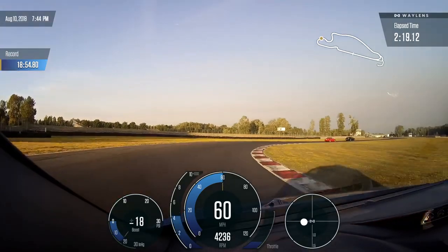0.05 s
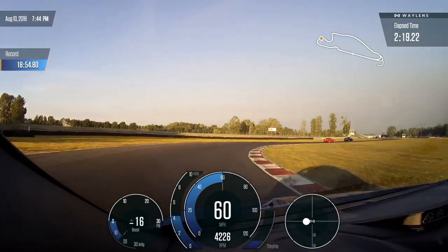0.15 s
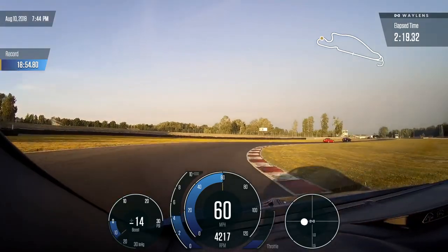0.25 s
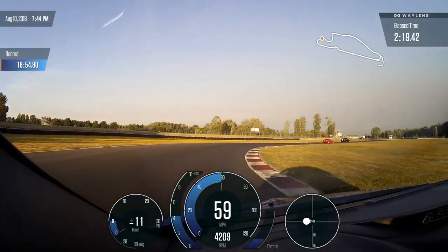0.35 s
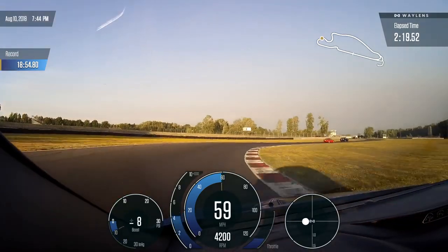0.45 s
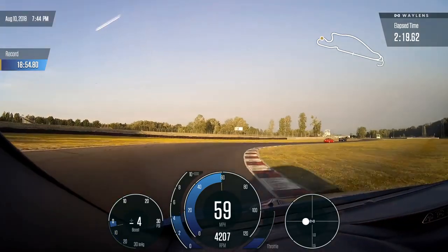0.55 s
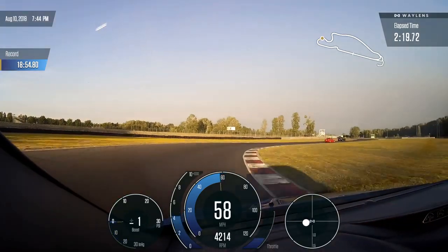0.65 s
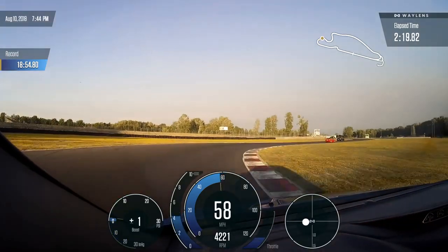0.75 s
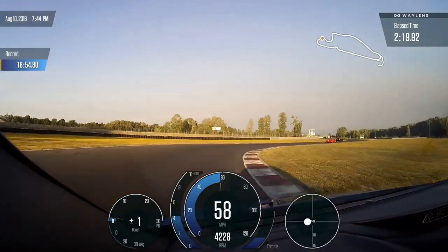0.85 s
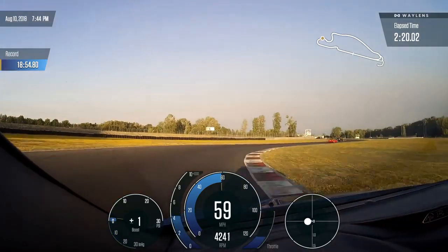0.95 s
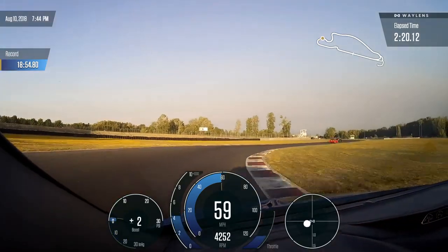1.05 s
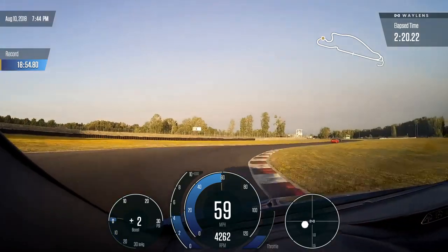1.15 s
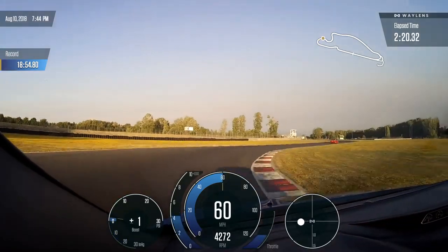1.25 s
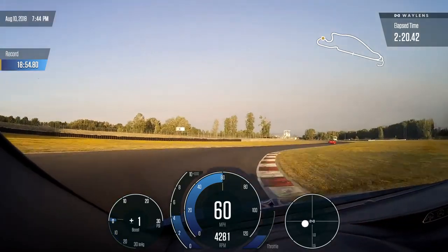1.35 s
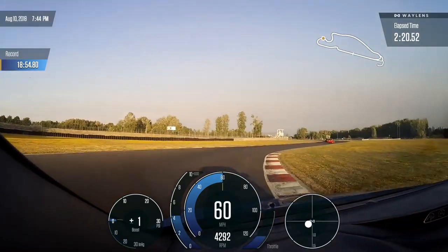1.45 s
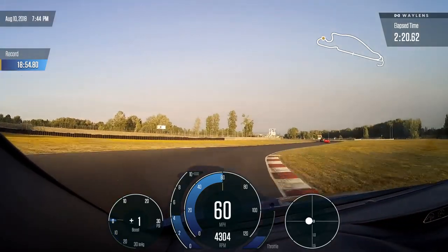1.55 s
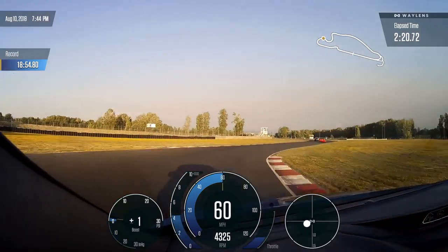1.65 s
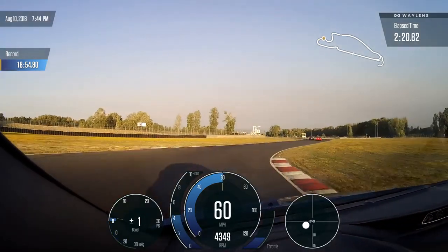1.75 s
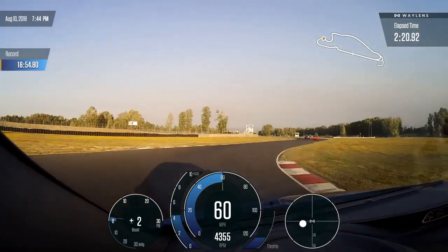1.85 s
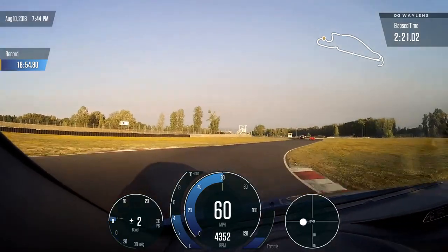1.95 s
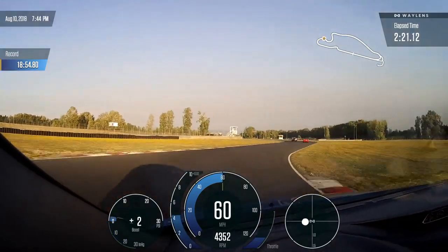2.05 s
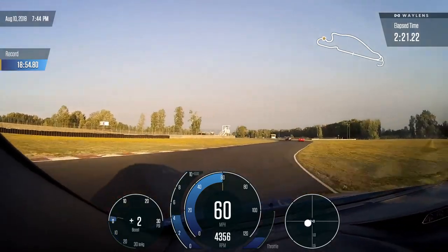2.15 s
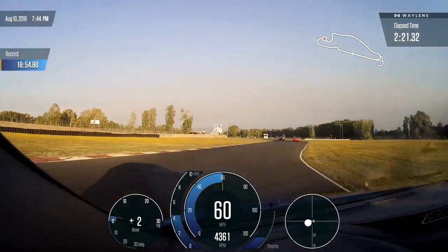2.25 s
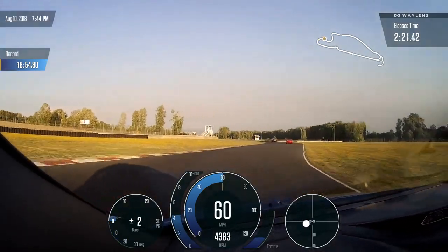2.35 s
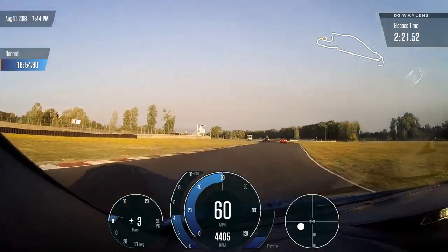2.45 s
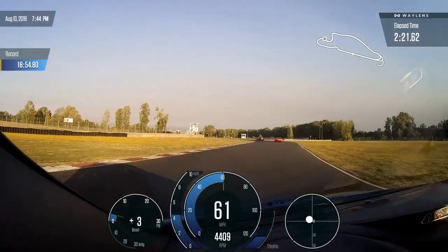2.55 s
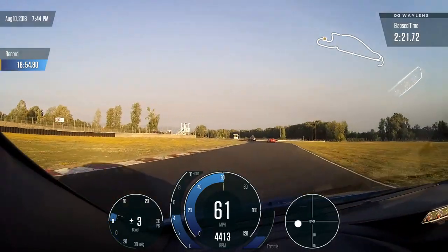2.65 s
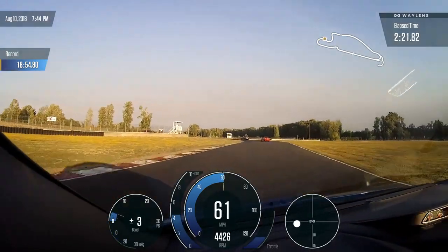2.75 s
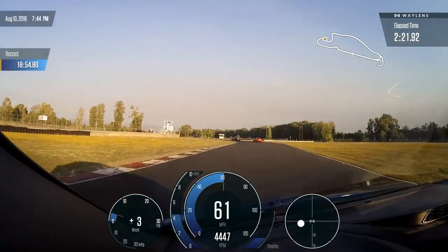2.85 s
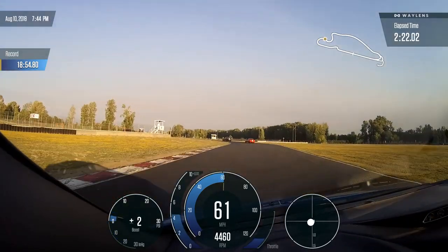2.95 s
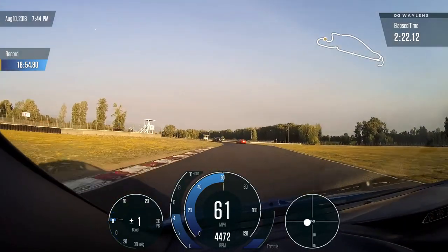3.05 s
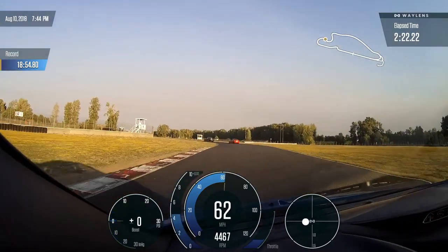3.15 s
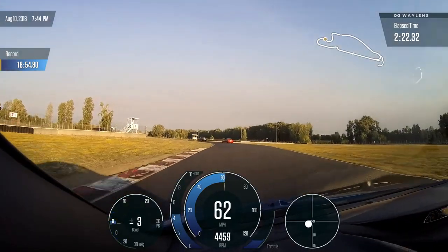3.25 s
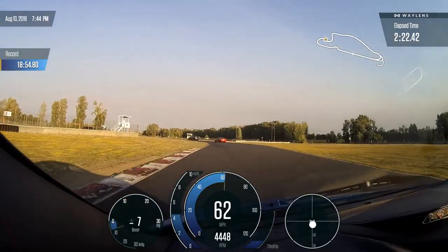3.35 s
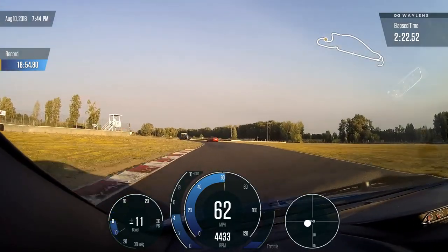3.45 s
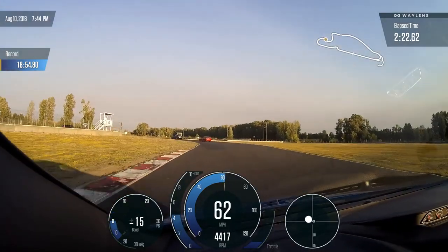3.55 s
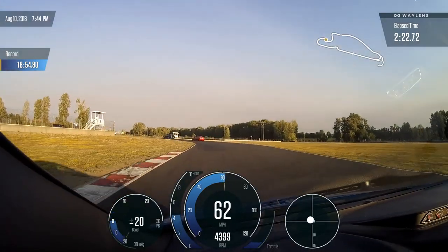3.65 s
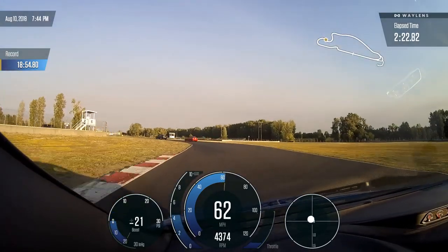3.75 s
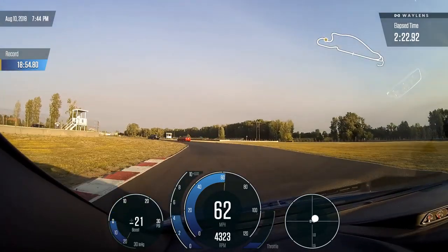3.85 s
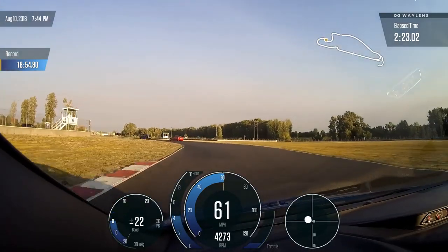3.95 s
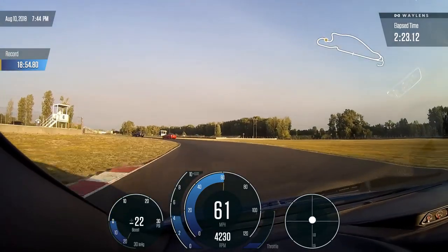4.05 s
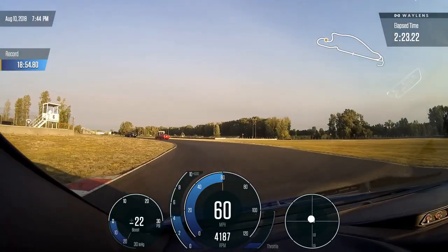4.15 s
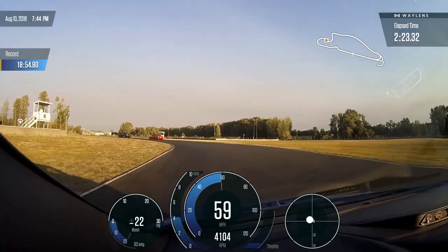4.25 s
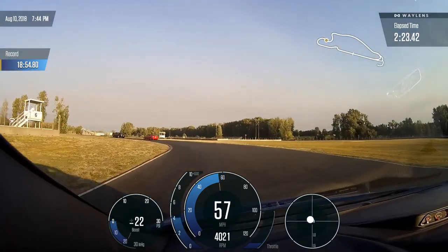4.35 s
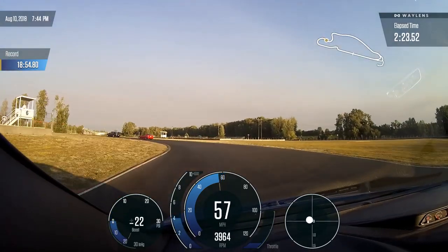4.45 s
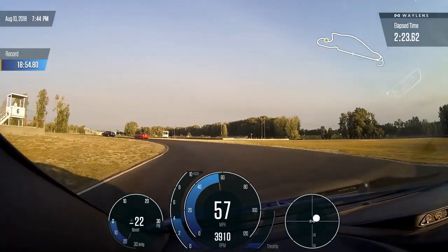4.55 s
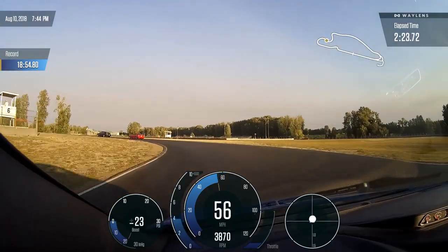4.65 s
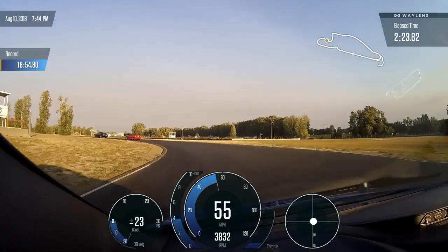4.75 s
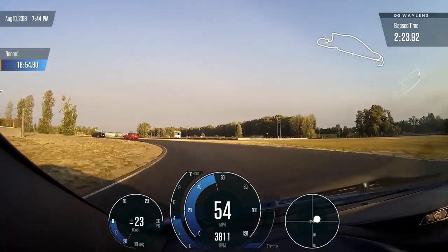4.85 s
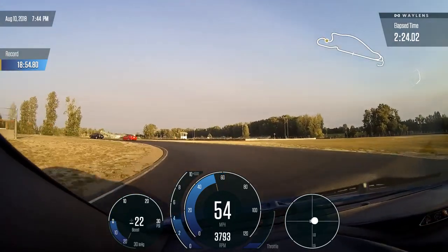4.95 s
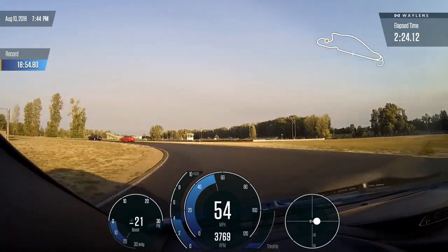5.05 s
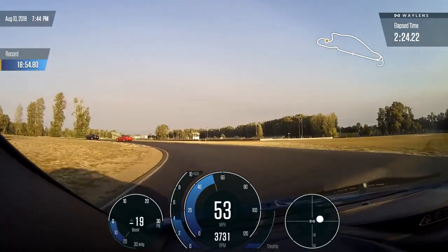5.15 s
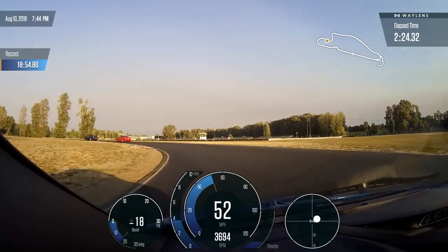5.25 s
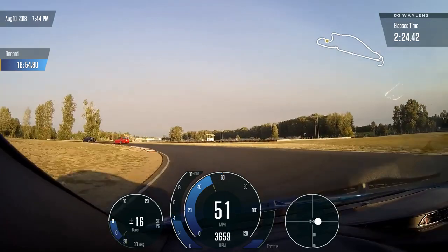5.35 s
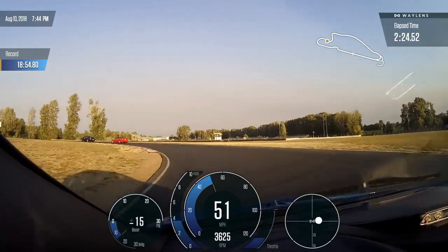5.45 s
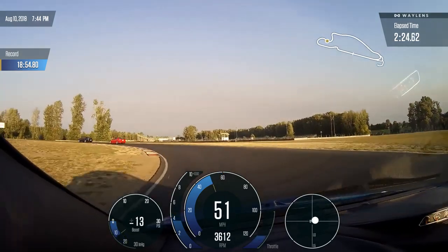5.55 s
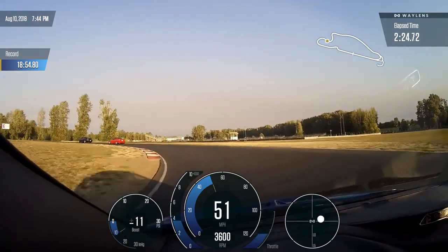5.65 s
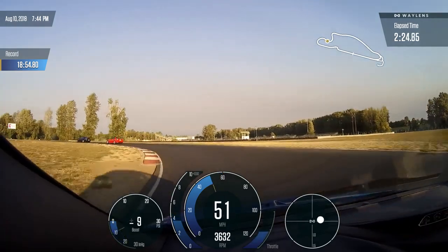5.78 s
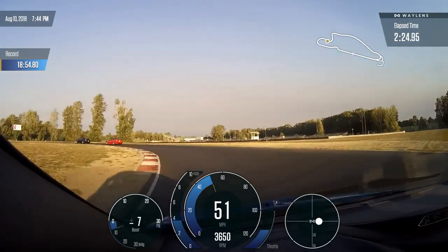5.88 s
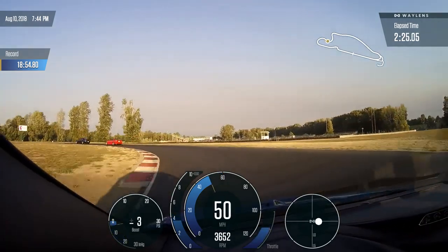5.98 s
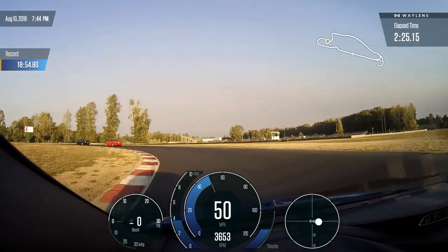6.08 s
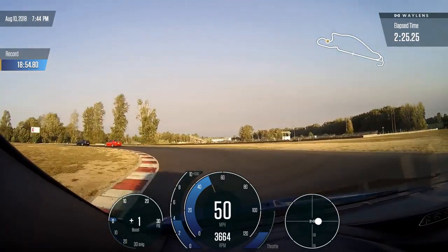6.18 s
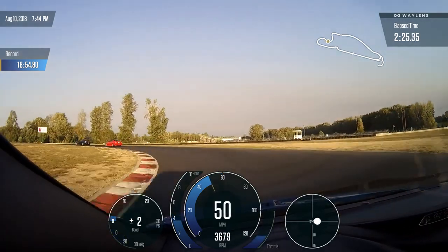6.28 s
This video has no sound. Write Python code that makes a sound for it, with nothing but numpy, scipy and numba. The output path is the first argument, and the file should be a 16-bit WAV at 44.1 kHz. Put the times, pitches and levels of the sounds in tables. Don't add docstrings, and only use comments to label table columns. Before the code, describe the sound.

A booming four-cylinder engine pulls through a bend amid tyre and wind roar, drums over a kerb, then slows with a short turbo whistle.

```python
import sys
import numpy as np
from scipy import signal
from scipy.fft import rfft, irfft, next_fast_len
from scipy.io import wavfile
from scipy.ndimage import uniform_filter1d
from numba import njit

SR = 44100
rng = np.random.default_rng(int(sys.argv[2]) if len(sys.argv) > 2 else 0)


def waveform_to_disk(signal):
    frames = np.transpose(np.atleast_2d(signal))
    scaled = np.clip(frames, -1, 1) * 32767
    samples = np.round(scaled).astype(np.int16)
    wavfile.write(sys.argv[1], SR, samples)


def linear_from_db(decibels):
    return 10 ** (np.asarray(decibels, float) / 20)


N = 278712
TIME = np.arange(N) / SR

# time in seconds, throttle from 0 to 1, pressure of the engine's air from 0 to 1.
PEDAL = [(0, .3, 0.35), (.5, 0.48, 0.5), (.62, 0.95, 0.6),
                                               (.92, 0.9, 0.7), (1.05, 1, 0.94), (3.33, 0.92, 1),
                                               (3.41, 0.42, 0.4), (3.62, .3, .45), (3.75, 0.1, 0.4),
                                               (4.05, 0.34, 0.14), (5.78, 0, 0), (5.85, 0.91, 0.7),
                                               (6.32, 0.75, 0.9)]
# time in seconds, sideways tyre slip in dB, air flow through intake and round the screen in dB.
CORNER = [(0, 5, 1), (.5, 3.5, -.5), (.8, 3, -2), (.97, 0.5, -0.5), (1.42, 2.5, 3), (1.75, 6, 1.5),
          (2.2, 4, 5), (2.37, 1, 8.5), (2.6, 2, 7), (3.0, 0.5, 6.5), (3.48, -0.5, 7.5), (3.75, -2.5, 4.5),
          (4.27, -5, -1.5), (4.5, -3.5, -5), (4.7, -6, -5), (5.5, -2, -3), (6.0, -2.5, -4.5),
          (6.32, 0.5, -3)]


def curves(table):
    s, *columns = np.transpose(table)
    return [np.interp(TIME, s, c) for c in columns]


def walk(rate):
    k = int(SR / rate)
    levels = np.repeat(rng.standard_normal(N // k + 1), k)
    return 1.1 * uniform_filter1d(uniform_filter1d(levels, k), k)[:N]


def bell(at, half):
    return np.exp(-.5 * ((TIME - at) / half) ** 2)


def between(span_db, control):
    return span_db[0] + (span_db[1] - span_db[0]) * control


@njit
def svf(x, hz, width):
    y, b, l = np.empty(len(x)), 0., 0.
    for i in range(len(x)):
        g, k = np.tan(np.pi * hz[i] / SR), width[i] / hz[i]
        v = (b + g * (x[i] - l)) / (1 + g * (g + k))
        b, l, y[i] = 2 * v - b, l + 2 * g * v, k * v
    return y


def ring_twice(x, hz, width, second_width):
    centre = np.full(N, 1. * hz)
    return svf(svf(x, centre, np.full(N, 1. * width)), centre, np.full(N, 1. * second_width))


def hiss(hz, width):
    hz, width = hz * np.ones(N), width * np.ones(N)
    band = svf(svf(rng.standard_normal(N), hz, width), hz, width)
    return band * np.sqrt(SR / (np.pi / 2 * width))


def slice_of_noise(lo_hz, hi_hz):
    spectrum, hz = rfft(rng.standard_normal(N)), np.arange(N // 2 + 1) * SR / N
    return irfft(spectrum * (hz > lo_hz) * (hz < hi_hz), N)


def air():
    # time in seconds, extra rumble in dB, half length in seconds.
    bumps = [(.05, 5, 0.17), (.5, 5.5, .1), (1.45, 10, .14), (2.1, 6.5, .1), (2.4, 6, .12), (2.84, 3, .05),
             (3.7, 4, .13), (4.15, 4, .1), (5.2, 1, .25), (5.6, -4.5, 0.045), (6.05, -6.5, 0.13),
             (.3, 4.5, .07), (1.2, 4, 0.066), (1.75, 5.5, .06)]
    slip_db, flow_db = curves(CORNER)
    bump_db = sum(db * bell(s, half) for s, db, half in bumps)
    pull = uniform_filter1d(curves(PEDAL)[0], int(.3 * SR)) - .5
    gust_db = 3 * bell(2.39, 0.11)
    rumble_db = -41 + bump_db
    drone_db = -35 + .35 * flow_db + 0.17 * slip_db + 4.5 * pull + 0.14 * bump_db
    tyre_db = -38.5 + slip_db
    wind_db = -53.5 + 0.59 * flow_db + 0.13 * slip_db + gust_db
    intake_db = -61 + flow_db
    return np.array([rumble_db, drone_db, tyre_db, wind_db, intake_db])


def patchy(x, hiss_db=1.5, notch_db=2.2):
    # frequency in Hz, share of the time from 0 to 1.
    gap_share = [(3000, 0), (3400, .03), (4700, .03), (5000, .3), (5300, .3), (6200, .45), (6500, .35),
                 (6900, .02), (8300, .02), (9000, .1), (14000, .1)]
    hz, s, cells = signal.stft(x, SR, nperseg=1024)
    shape = (2, len(hz) // 4 + 1, len(s) // 5 + 1)

    def spread(v):
        return v.repeat(4, axis=1).repeat(5, axis=2)[:, :len(hz), :len(s)]

    depth = hiss_db * (hz > 3300) + notch_db * np.exp(-.5 * ((hz - 5800) / 700) ** 2)
    gaps = spread(rng.random(shape)) < np.interp(hz, *np.transpose(gap_share))[:, None]
    change_db = depth[:, None] * spread(rng.standard_normal(shape)) - 18 * gaps
    return signal.istft(cells * linear_from_db(change_db), SR, nperseg=1024)[1][:, :N]


def roar(phase):
    air_hz = [50, 300, 900, 2800, 8000]
    # frequency in Hz, level in dB.
    bass, treble, ports = [(14, -21.5), (30, -6), (48, -3.5), (68, -10.5), (95, -7), (130, -3), (160, -9),
                           (205, -7.5), (250, -14), (290, -17.5), (370, -13), (500, -13), (620, -14.5)], [(726, -15.5), (969, -11), (1240, -25.5), (1340, -30), (1680, -39),
                                         (2800, -34), (3370, -49.5), (4050, -43), (5410, -62.5),
                                         (6100, -60.5), (7510, -49), (8790, -56), (11100, -54),
                                         (14300, -59)], [(20, -92.5), (1000, -90.5), (1090, -42.5),
                                                         (1440, -36), (2330, -45.5), (3070, -44.5),
                                                         (3510, -53), (4100, -45), (4680, -56.5),
                                                         (5930, -46), (7220, -57), (12400, -55.5),
                                                         (14300, -58)]
    # frequency in Hz, width in Hz, strength in dB.
    panels = [(145, 53, -4.5), (423, 29, -2.5), (590, 50, -1.5), (191, 33, 3), (353, 37, 2), (510, 33, 2.5),
              (670, 20, 1), (880, 41, -4.5), (1240, 17, 4), (2967, 290, 5), (3920, 230, 3),
              (10160, 380, -4.5)]
    size = next_fast_len(N)
    octave = np.log2(np.maximum(np.arange(size // 2 + 1) * SR / size, 1))
    colours = []
    for table in ([*bass, *treble], ports):
        hz, db = np.transpose(table)
        colours.append(linear_from_db(np.interp(octave, np.log2(hz), db)))
    rings = linear_from_db(sum(db / (1 + (2 * (2 ** octave - hz) / width) ** 2) for hz, width, db in panels))
    step = int(45 * size / SR)
    spectra = []
    for colour in colours:
        noise = rings * rfft(rng.standard_normal(size)) * colour
        ripple = np.repeat(rng.standard_normal(len(octave) // step + 1), step)
        ripple = uniform_filter1d(ripple, step)[:len(octave)]
        spectra.append(noise * linear_from_db(0.5 * ripple * (octave > 10)))
    levels = air()
    swing = levels - levels.mean(axis=1, keepdims=True)
    out, gust = np.zeros((2, N)), walk(2.6)
    for centre in np.arange(4, 14.1, .5):
        mask = np.cos(np.pi * np.clip(octave - centre, -.5, .5))
        place = np.interp(centre, np.log2(air_hz), np.arange(len(air_hz)))
        k = min(int(place), len(air_hz) - 2)
        db = swing[k] + (place - k) * (swing[k + 1] - swing[k])
        db = db + 0.49 * gust + 0.99 * walk(11) + .5 * (place > 2.8) * walk(5)
        throb = 1 + 0.058 * (place > 1.5) * np.cos(phase)
        out += linear_from_db(db) * throb * np.array([irfft(s * mask, size)[:N] for s in spectra])
    return patchy(out) * linear_from_db(levels.mean() + 35.5)


def side_patches():
    # time in seconds, lowest Hz, highest Hz, half length in seconds.
    bursts = [(.24, 170, 430, .04), (.43, 170, 500, .025), (.47, 20, 130, .02), (.66, 260, 400, .04),
              (1.0, 20, 130, .035), (1.22, 20, 560, .04), (1.31, 260, 560, .02), (1.41, 60, 420, .03),
              (1.61, 390, 520, .02), (1.71, 40, 300, .035), (1.73, 390, 560, .025), (1.84, 20, 260, .03),
              (1.9, 20, 170, .04), (1.98, 130, 390, .025), (2.31, 20, 430, .035), (2.42, 20, 130, .05),
              (2.45, 260, 390, .02), (2.7, 170, 460, .045), (2.77, 20, 130, .025), (3.15, 480, 620, .02),
              (3.18, 20, 260, .04), (3.54, 20, 130, .025), (3.75, 40, 520, .045), (3.86, 220, 390, .04),
              (3.93, 390, 560, .02), (3.98, 220, 390, .03), (4.14, 20, 1000, .025), (4.1, 170, 520, .04),
              (4.26, 20, 600, .08), (4.42, 260, 800, .04), (4.38, 20, 130, .04), (4.51, 20, 130, .045),
              (4.52, 340, 480, .02), (4.63, 340, 480, .02), (5.0, 520, 680, .05), (5.47, 20, 220, .025),
              (5.62, 600, 820, .025), (5.88, 20, 390, .04), (6.02, 20, 110, .015), (6.09, 20, 110, .02)]
    # band centre in Hz, share of the time present from 0 to 1.
    flecks = [(690, .05), (776, .06), (862, .11), (948, .2), (1034, .4)]
    out = np.zeros(N)
    for s, lo, hi, half in bursts:
        swell = np.clip(2.45 * bell(s, half) - 1.5, 0, 1) ** .5
        out += linear_from_db(-38 + 4.5 * (hi < 310)) * swell * slice_of_noise(lo, hi)
    frame, slip_db = 1024, curves(CORNER)[0]
    for hz, share in flecks:
        present = np.repeat(rng.random(N // frame + 1), frame)[:N] < share * linear_from_db(.8 * slip_db)
        fade = uniform_filter1d(1. * present, frame)
        out += linear_from_db(-40.5 + .5 * slip_db) * fade * slice_of_noise(hz - 43, hz + 43)
    return out


def tread(rate=22, width=38, scatter_db=3.0, share_db=-10):
    tread_hz = [640, 700, 810, 860, 900, 950, 1000, 1050]
    out = np.zeros(N)
    for hz in tread_hz:
        chance = rng.random((2, N))
        slips = (chance[0] < rate / SR) * linear_from_db(-scatter_db * np.log(chance[1] + 0.0075))
        out += ring_twice(slips, hz, width, 1.4 * width)
    return out / out.std() * linear_from_db(air()[2] + share_db)


def scrub():
    # time in seconds, centre in Hz, width in Hz, level in dB, half length in seconds.
    rasps = [(.093, 914, 70, -40, 0.059), (.163, 810, 90, -37, 0.018), (.22, 640, 60, -36, 0.042),
             (.44, 962, 90, -41, 0.043), (.495, 688, 60, -40.5, .08), (.65, 950, 100, -43, 0.034),
             (1.033, 750, 400, -31, .004), (1.467, 880, 80, -38, .02), (1.552, 1240, 60, -39, 0.016),
             (1.58, 990, 80, -39, 0.011), (1.663, 870, 140, -36, .018), (1.71, 830, 90, -38, 0.011),
             (1.76, 950, 120, -35, .015), (1.82, 870, 180, -29, .015), (1.91, 830, 100, -31, 0.0083),
             (1.974, 1000, 80, -33, .016), (2.02, 960, 160, -33.5, 0.013), (2.152, 885, 257, -29, 0.019),
             (2.2, 930, 110, -34, .012), (2.284, 840, 120, -37, .012), (2.345, 583, 80, -35, .014),
             (2.478, 860, 90, -33.5, .014), (2.546, 865, 90, -34.5, 0.023), (2.62, 800, 90, -37, .03),
             (2.9, 834, 60, -44, 0.068), (3.75, 990.3, 80, -43, .05), (4.002, 960, 90, -45, .03),
             (4.085, 957, 80, -39, 0.016), (4.21, 987, 100, -42, 0.017), (4.453, 970, 90, -44.5, .05),
             (5.55, 930, 79.7, -41.5, .025), (5.65, 975, 70, -41, .03), (5.9, 1040, 90, -44, .02),
             (6.154, 957, 70, -43, 0.037), (3.6, 204, 30, -44, .04), (4.2, 204, 35, -40.5, 0.13)]
    return sum(linear_from_db(db) * bell(s, half) * hiss(hz, width) for s, hz, width, db, half in rasps)


def rattle(rate=900, hz=5900, width=550, scatter_db=4.0, level_db=-68):
    chance = rng.random((2, N))
    sizes = linear_from_db(-scatter_db * np.log(chance[1] + .004))
    ticks = (chance[0] < rate / SR) * sizes * rng.choice([-1, 1], N)
    ring = ring_twice(ticks, hz, width, 1.5 * width)
    wind_db = air()[3 + 1]
    return ring / ring.std() * linear_from_db(level_db + .8 * (wind_db - wind_db.mean()))


def trim():
    # time in seconds, peak in dB, pitch in Hz.
    ticks = [(0.1511, -71, 5370), (0.4234, -78, 5300), (0.4683, -66, 5850), (0.6175, -65, 5910),
             (0.6584, -62, 5750), (1.0844, -66, 6300), (1.3014, -57, 5930), (1.4411, -67, 6260),
             (1.5823, -65, 5510), (1.8407, -65, 5410), (1.8996, -65, 6170), (2.0068, -67, 6300),
             (2.0323, -66, 5760), (2.3057, -66, 5460), (2.4335, -57, 6300), (2.4513, -52, 5690),
             (2.5496, -65, 5840), (2.6444, -65, 5330), (2.6918, -66, 5310), (2.7481, -73, 5300),
             (2.9864, -68, 5350), (3.0839, -73, 5300), (3.1313, -73, 5310), (3.1971, -71, 6300),
             (3.253, -68, 6300), (3.3578, -71, 5300), (3.4012, -70, 6300), (3.5798, -69, 5490),
             (3.7778, -61, 5770), (3.9479, -62, 5300), (3.9649, -57, 6090), (4.0562, -71, 5500),
             (4.2208, -68, 5310), (4.3774, -70, 5840), (4.4233, -71, 5720), (4.9826, -73, 5800),
             (5.1593, -67, 6000), (5.2505, -67, 5800), (5.5727, -69, 5310), (5.5962, -64.5, 5450),
             (5.6246, -61, 5790), (5.868, -77, 5300), (6.0582, -81, 5340), (6.1145, -73, 5470)]
    swells = sum(linear_from_db(db - 6.5) * bell(s + .012, 0.0085) for s, db, _ in ticks)
    return swells * hiss(curves(ticks)[1], 450)


def thumps():
    # time in seconds, peak in dB, pitch in Hz, time to die by 60 dB in seconds, direction.
    blows = [(.014, -17, 70, 0.075, -1), (.829, -32, 85.9, 0.088, 1), (2.38, -21, 50, .3, 1),
             (3.215, -22, 55.03, .2, -1), (3.765, -16, 85, 0.066, 1), (3.797, -15, 55.4, 0.11, -1),
             (3.826, -14, 55.6, 0.078, -1), (3.978, -31, 34.94, 0.12, 1), (5.699, -25, 65.14, .15, 1),
             (5.75, -24, 70, .15, 1)]
    out = np.zeros(N)
    for s, db, hz, t60, direction in blows:
        t = np.maximum(TIME - s, 0)
        fade = np.exp(-np.log(1000) * t / t60) * (1 - np.exp(-t / 0.004))
        out += direction * linear_from_db(db) * np.sin(2 * np.pi * hz * t) * fade
    return out


def kerb(firing):
    # time in seconds, ridge rate in Hz, level in dB, floor drumming in dB.
    strip = [
        (.95, 32.17, -57, -60),
        (1.1, 32.34, -34, -35),
        (1.25, 31.8, -37, -42),
        (1.36, 32, -31.5, -27.5),
        (1.5, 31.93, -29.5, -28.5),
        (1.62, 32.16, -40, -29),
        (1.8, 32.8, -62, -64),
    ]
    # multiple of the ridge rate, level in dB.
    ridges = [(1, -18), (3, -1.5), (5, -12), (6, -2.5), (7.5, -14)]
    hz, db, drum_db = curves(strip)
    phase = 2 * np.pi * np.cumsum(hz) / SR
    lines = sum(linear_from_db(g + 2.0 * walk(9.4)) * np.cos(k * phase + 0.52 * walk(11.0)) for k, g in ridges)
    meet = int(1.41 * SR)
    drum = np.cos(4 * (phase - phase[meet]) + firing[meet])
    return (linear_from_db(db) * lines + linear_from_db(drum_db) * np.sqrt(2) * drum) * (db > db.min())


def turbo():
    # time in seconds, centre in Hz, width in Hz, level in dB.
    spool = [
        (.78, 7800, 3000, -85),
        (.84, 8800, 4000, -73),
        (.92, 11000, 6000, -66.5),
        (.99, 12400, 7000, -63),
        (1.06, 13500, 6000, -63.5),
        (1.14, 13800, 6000, -84),
    ]
    blow_off = [
        (3.3, 9800, 900, -85),
        (3.355, 9900, 700, -72),
        (3.365, 9900, 600, -57),
        (3.39, 9800, 1200, -57),
        (3.405, 9500, 1700, -57),
        (3.412, 8300, 1400, -56),
        (3.435, 7400, 900, -57),
        (3.46, 7200, 800, -85),
    ]
    whine = [(3.9, 10780, 60, -95), (4.3, 10760, 60, -87), (5.4, 10740, 60, -87), (6.2, 10740, 60, -93)]
    # time in seconds, centre in Hz, width in Hz, level in dB, half length in seconds.
    bursts = [(3.44, 13500, 3000, -63.5, .02), (3.972, 11500, 6000, -55.5, .008),
              (3.97, 7700, 900, -58, 0.012), (3.97, 6100, 1500, -60.5, .012), (2.46, 5660, 890, -57, 0.013),
              (6.32, 10500, 6000, -65, .03), (1.56, 3800, 1500, -63, .05), (1.65, 12500, 4000, -69, .2),
              (1.12, 5800, 800, -68, .01), (4.1, 5900, 800, -68, .01), (6.25, 5800, 800, -70, .01),
              (.03, 5800, 800, -68, .01)]
    out = sum(linear_from_db(db) * bell(s, half) * hiss(hz, width) for s, hz, width, db, half in bursts)
    for sweep in (spool, blow_off, whine):
        hz, width, db = curves(sweep)
        out += linear_from_db(db + 2.0 * walk(41)) * hiss(hz, width) * (TIME > sweep[0][0]) * (TIME < sweep[-1][0])
    return out


def engine():
    # time in seconds, firing rate in Hz.
    speed = [(0, 140.8), (.15, 140.6), (.38, 141.8), (.72, 140.2), (1.05, 141.8), (1.3, 142.5), (1.75, 145),
             (2.3, 146), (2.55, 147.2), (3.15, 149), (3.32, 149), (3.72, 145.9), (4.15, 139.6),
             (4.5, 132.1), (5.1, 124.8), (5.5, 121.1), (5.75, 120.5), (6.32, 122)]
    # seconds, boom in dB.
    boom_level = [(0, -32), (.15, -31), (.35, -34.5), (.6, -33), (.75, -28), (.9, -30), (1.07, -24.5),
                  (1.6, -28), (2.5, -26), (3.3, -27.5), (3.42, -35.5), (3.72, -35.5), (3.8, -30),
                  (4.35, -22.5), (5.3, -19), (5.7, -19), (5.88, -27), (6.32, -23)]
    # seconds, half length in seconds, depth 0 to 1.
    handover = [(.44, 0.039, 1), (3.496, 0.046, 0.96), (3.72, 0.034, .7), (3.95, .06, 0.27),
                (5.735, 0.0088, .3), (5.816, 0.016, 0.85), (5.95, .04, 0.25), (6.2, .03, 0.2)]
    # multiple of the firing rate, dB against the third,
    # dB kept on overrun, dB per Hz of revs.
    overtones = [(.25, -12.5, 8.5, 0.5), (1.5, -12, 10, 0), (2.5, -13.5, 7, 1), (3.5, -12, 9, 0.3),
                 (4.5, -18, 16, 0.2), (5, -20, 9.5, 0.7), (6, -22, 5, 0)]
    (hz,), (boom_db,), (throttle, pressure) = curves(speed), curves(boom_level), curves(PEDAL)
    revs = hz - 146
    crank_db = between((-45.5, -35.5), pressure) + 0.5 * revs + 2.3 * walk(6.5)
    third_db = between((-53, -35.5), throttle)
    fourth_db = between((-59, -36.5), pressure)
    phase = 2 * np.pi * np.cumsum(hz) / SR
    boom = phase - 1.15 * revs / 24.5 + .04 * walk(30)
    force = np.prod([1 - depth * bell(s, half) for s, half, depth in handover], axis=0)
    out = linear_from_db(boom_db + 0.5 * walk(25)) * force * (np.cos(boom) + linear_from_db(-32.5) * np.cos(2 * phase + 0.4))
    lines = [(.5, crank_db), (3, third_db), (4, fourth_db), (2, fourth_db - 7.5 - 0.098 * revs)]
    for k, db, kept_db, slope in overtones:
        lines.append((k, third_db + db + kept_db * (1 - throttle) + slope * revs))
    for k, db in lines:
        slip = .4 + 1.35 * (k % 1 > 0) * k
        waver_db = (.5 + 2.0 * (1 - throttle)) * walk(22)
        out += linear_from_db(db + waver_db) * np.cos(k * phase + slip + .08 * walk(18))
    return np.sqrt(2) * out, boom


def scene():
    motor, phase = engine()
    mid, side = roar(phase)
    mid = mid + motor + kerb(phase) + thumps() + scrub() + turbo() + trim() + tread()
    band = signal.butter(4, [1120, 3600], "bandpass", fs=SR, output="sos")
    lag = np.gradient(signal.sosfiltfilt(band, mid))
    side = side + .2 * lag + rattle() + side_patches() + linear_from_db(-5.0) * turbo()
    return np.array([mid + side, mid - side])


def low_pass(x):
    return signal.sosfilt(signal.butter(12, 14430, fs=SR, output="sos"), x)


def record(dry):
    spectrum = rfft(dry, axis=1)
    spectrum[:, int(14300 * N / SR):] = 0
    return low_pass(irfft(spectrum, N, axis=1))


dry = scene()
out = record(dry)
waveform_to_disk(out)
```